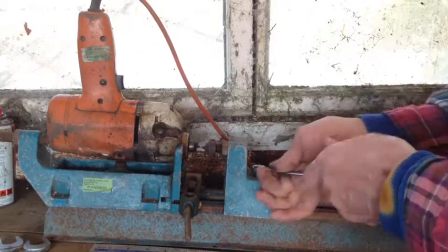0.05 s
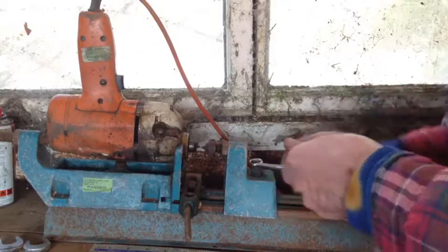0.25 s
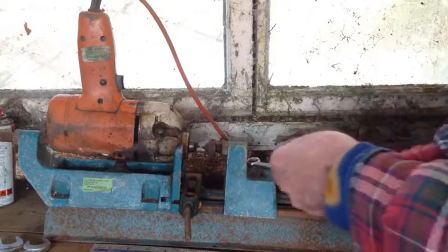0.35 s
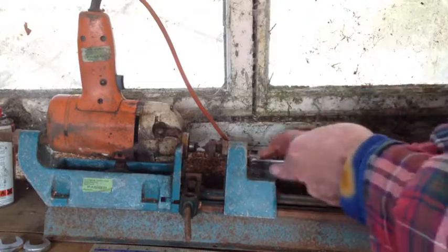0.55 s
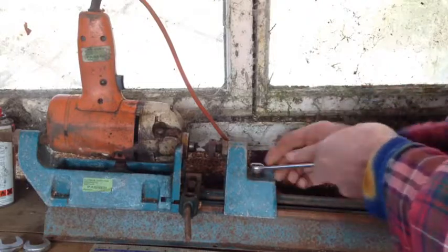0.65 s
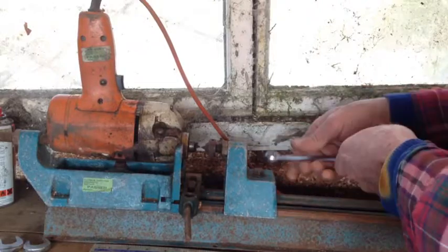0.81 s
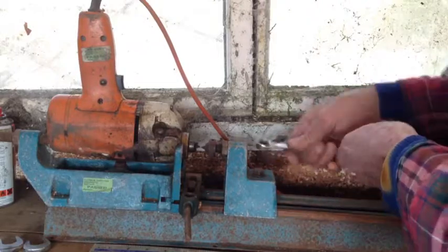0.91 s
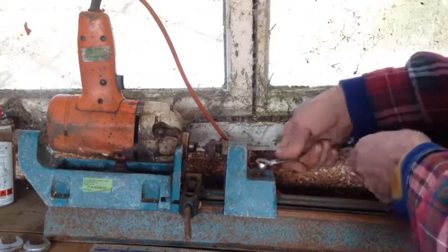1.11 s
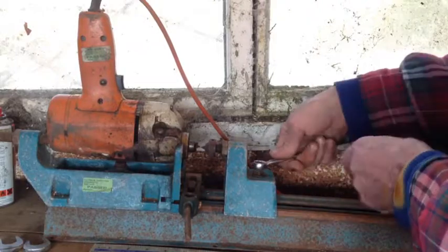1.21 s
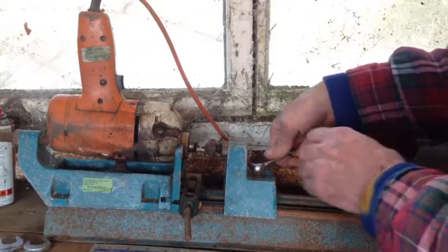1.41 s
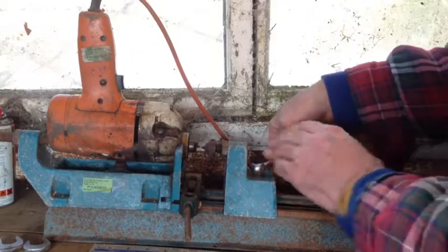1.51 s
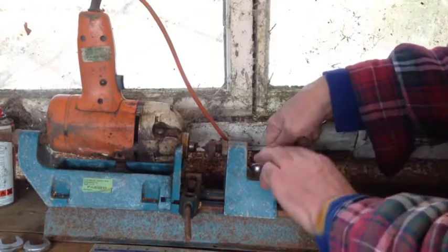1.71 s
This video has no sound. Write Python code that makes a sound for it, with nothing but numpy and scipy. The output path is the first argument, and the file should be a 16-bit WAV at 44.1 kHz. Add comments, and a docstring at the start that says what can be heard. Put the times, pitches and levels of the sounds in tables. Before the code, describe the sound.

A steel spanner clinks and knocks on a nut of a heavy cast-iron machine in a workshop

```python
"""A spanner is fitted on a nut of a cast-iron machine bed and turned, in a small workshop.
First come clustered knocks and rubs, then a pause, one lone knock, and a second cluster ending in a rub.
Each knock sums decaying steel and bed modes, a dense noise tail with a wall step, a clack and a thump.
Rubs are random slips convolved with tail and bed; sleeve rustle and room noise run throughout."""
import sys
import numpy as np
from scipy import signal
from scipy.fft import rfft, irfft
from scipy.io import wavfile
from scipy.ndimage import uniform_filter1d

SR = 44100
rng = np.random.default_rng(int(sys.argv[2]) if len(sys.argv) > 2 else 0)


def digitize_waveform(pressure):
    """Quantize a signal to 16-bit integers and store it at the path in sys.argv[1].

    Rows of a 2-D input are taken as channels; values are limited to [-1, 1].
    """
    field = np.atleast_2d(pressure).T
    bounded = np.clip(field, -1, 1)
    quanta = np.round(bounded * 32767).astype(np.int16)
    wavfile.write(sys.argv[1], SR, quanta)


N = 77175
LENGTH = 16384  # samples per impact response
T = np.arange(LENGTH) / SR


def amp(db):
    """Decibels to gain."""
    return 10 ** (np.asarray(db) / 20)


def unit(x):
    """Scales to rms 1."""
    return x / np.sqrt(np.mean(x ** 2) + 1e-20)


def read(points, hz):
    """Reads a table on a log-frequency axis."""
    f, value = np.transpose(points)
    return np.interp(np.log(hz + 1), np.log(f + 1), value)


def add(mix, s, sound):
    """Mixes a sound in at time s."""
    part = mix[max(round(s * SR), 0):][:len(sound)]
    part += sound[:len(part)]


def noise(points, size):
    """Steady noise shaped by a (Hz, dB) spectrum."""
    spectrum = rfft(rng.standard_normal(size))
    hz = np.fft.rfftfreq(size, 1 / SR)
    return irfft(spectrum * amp(read(points, hz)), size)


def lowpass(x, hz, order=2):
    """Causal Butterworth low-pass."""
    sos = signal.butter(order, min(hz, .47 * SR), fs=SR, output="sos")
    return signal.sosfilt(sos, x)


def rise(seconds, delay=0):
    """Smooth attack from 0 to 1."""
    return 1 - np.exp(-(np.maximum(T - delay, 0) / seconds) ** 2)


def ring(modes):
    """Sums decaying partials (Hz, dB, t60 s); neighbours in the list start in opposite directions."""
    total = np.zeros(LENGTH)
    for k, (hz, db, t60) in enumerate(modes):
        total += (-1) ** k * amp(db - 60 * T / t60) * np.sin(2 * np.pi * hz * T)
    return total


def knock(db, cut_hz, ring_db, low_db, bed_db, thump_db, clack_hz, clack_db):
    """A blow excites spanner, bed and tail, duller when the contact is soft; clack and thump bypass that cut."""
    metal = wash() + spanner(ring_db, low_db) + amp(bed_db) * bed()
    contact = lowpass(metal, cut_hz, order=3)
    return amp(db) * (contact + amp(clack_db) * clack(clack_hz) + amp(thump_db) * thump())


def spanner(ring_db, low_db):
    """Steel modes of spanner and nut ring; the lowest ones have their own extra level."""
    # spanner and nut modes: mode_hz, relative_level_db
    steel_modes = [(1667, -29), (1716, -25), (1759, -20), (1829, -29), (2363, -32), (2462, -28),
                   (2780, -33), (3082, -24), (3712, -23), (3778, -25), (4056, -27), (4274, -24),
                   (5060, -26), (5367, -23), (5523, -24), (5728, -27), (6093, -27), (6410, -29),
                   (7183, -27), (7546, -27), (8067, -29), (8733, -27), (8880, -30), (10353, -30),
                   (12847, -36), (14115, -31)]
    # their decay: frequency_hz, t60_s
    steel_t60 = [(1700, 0.22), (3500, 0.15), (6000, 0.13), (9000, 0.12), (14000, 0.11)]
    low_modes_hz, rise_s = 2100, 0.0025
    modes = []
    for hz, level_db in steel_modes:
        level_db += ring_db + low_db * (hz < low_modes_hz)
        modes.append((hz, level_db, read(steel_t60, hz)))
    return ring(modes) * rise(rise_s)


def bed():
    """The heavy casting answers a blow with a low clunk."""
    # machine bed modes: mode_hz, relative_level_db, t60_s
    bed_modes = [(336.5, -28.5, 0.12), (377.3, -29, 0.16), (576.7, -33.5, 0.15), (798.8, -15.5, 0.099),
                 (849, -21.5, 0.078), (938.4, -20.5, 0.14), (1110.6, -20.5, 0.11), (1155, -27.5, 0.19),
                 (1976, -36.5, 0.14)]
    delay_s, rise_s = 0.00054, 0.0056
    return ring(bed_modes) * rise(rise_s, delay_s)


def wash():
    """Countless weak modes and reflections: a direct crack, a slower bass and a step up from the near wall."""
    # dense ringing of machine and room: frequency_hz, relative_level_db
    wash_spectrum = [(25, -56.5), (70, -38), (190, -27.5), (330, -13), (450, -15), (600, -9.5), (710, -16),
                     (850, -7.5), (1150, -11.5), (1420, -14.5), (1800, -9), (2200, -11.5), (3000, -9.5),
                     (5600, -9.5), (9000, -10.5), (12000, -17.5), (14400, -12), (15600, -53.5)]
    # its decay: frequency_hz, t60_s
    wash_t60 = [(200, .2), (530, 0.19), (1400, 0.16), (3700, 0.14), (9700, 0.088), (15000, .09)]
    rise_s, bass_rise_s, bass_hz = 0.00025, 0.002, 1190
    direct_db, direct_s = -1.5, 0.0022
    wall_s, wall_db = 0.0025, -3.5

    hz, t, z = signal.stft(noise(wash_spectrum, LENGTH), SR, nperseg=256)
    decay = amp(-60 * t / read(wash_t60, hz)[:, None])
    tail = signal.istft(z * decay, SR, nperseg=256)[1][:LENGTH]
    # forward and backward passes cancel the phase shift
    bass = lowpass(lowpass(tail, bass_hz)[::-1], bass_hz)[::-1]
    crack = amp(direct_db) * np.diff(tail, prepend=0) * np.exp(-T / direct_s)
    wall = np.sqrt(1 + amp(wall_db) ** 2 * rise(rise_s, wall_s))
    return wall * (bass * rise(bass_rise_s) + (tail - bass + crack) * rise(rise_s))


def clack(pitch_hz):
    """The jaw clacks: three short partials and a tail resonating at their pitch."""
    t60_s, rise_s, spread = 0.028, 0.00013, .07
    echo_db, echo_q = 7.5, 4
    cluster = [(pitch_hz * (1 + spread * k), -9 * abs(k) - 4, t60_s) for k in (-1, 0, 1)]
    echo = signal.lfilter(*signal.iirpeak(pitch_hz, echo_q, SR), wash())
    return ring(cluster) * rise(rise_s) + amp(echo_db) * echo


def thump():
    """The bench thumps: one low mode with a slow attack."""
    pitch_hz, gain_db, t60_s, rise_s = 339, 4.5, 0.037, 0.0089
    return ring([(pitch_hz, gain_db, t60_s)]) * rise(rise_s)


def rub(length_s, db, cut_hz, bed_db):
    """Tiny random slips under one stroke excite the bed and the tail."""
    slips_per_s = 1100
    slips = rng.standard_normal(LENGTH) * (rng.random(LENGTH) < slips_per_s / SR)
    slips *= np.sqrt(np.abs(np.sin(np.pi * np.minimum(T / length_s, 1))))
    slips /= np.linalg.norm(slips) + 1e-9
    response = wash() + amp(bed_db) * bed()
    return amp(db) * lowpass(signal.fftconvolve(slips, response), cut_hz, order=4)


def sleeves():
    """Moving sleeves rustle: shaped noise whose level drifts and flutters."""
    # rustle colour: frequency_hz, relative_density_db
    sleeve_spectrum = [(100, -4), (400, -9), (1800, -1.5), (5000, -5), (10000, -11.5), (14800, -11.5),
                       (15700, -46.5)]
    # rustle level before flutter: time_s, level_db
    sleeve_level = [(0, -62.5), (.13, -63), (.2, -55), (.47, -60.5), (0.602, -57), (0.848, -59.5),
                    (1.02, -55), (1.09, -65.5), (1.339, -60.5), (1.6, -57.5), (1.75, -55.5)]
    flutter_db, flutter_s = 1, 0.016
    flutter = unit(uniform_filter1d(rng.standard_normal(N), max(int(flutter_s * SR), 1)))
    level_db = np.interp(np.arange(N) / SR, *np.transpose(sleeve_level)) + flutter_db * flutter
    return amp(level_db) * unit(noise(sleeve_spectrum, N))


def room():
    """The quiet room: steady, mostly low noise."""
    # room noise colour: frequency_hz, relative_density_db
    room_spectrum = [(25, -31.5), (45, -20), (80, -4), (170, -0.5), (260, -3.5), (450, -11.5), (800, -11),
                     (1500, -24), (4000, -33), (9000, -36.5), (15000, -34)]
    level_db = -58
    return amp(level_db) * unit(noise(room_spectrum, N))


def scene():
    """Knocks and rubs over rustle and room noise."""
    # jaw meets nut: start_s, strength_db, contact_cutoff_hz, spanner_ring_db, extra_low_modes_db,
    # bed_clunk_db, thump_db, clack_pitch_hz, clack_db (all but strength relative to the knock)
    knocks = [(0.139, -24, 3240, -4, 0, 12.5, -18, 2593, -10),
              (0.168, -38.5, 5800, -16, 4, 22.5, -27, 2740, -3),
              (0.181, -20, 1900, -17, 0, -1, -9, 1300, -15),
              (0.2466, -0.5, 12000, 3.5, -4.5, -1, -18, 5610, -7.5),
              (0.2533, -9, 7000, -5.5, -4.5, -28, -20, 1180, -4.5),
              (0.3490, -15, 2980, -9.5, 0, 9, -23, 2860, -11.5),
              (0.41, -29, 1500, -14, 1, 4.5, -7, 980, -5),
              (0.5160, -19, 3520, 1, -8.5, 11, -17, 2720, -7.5),
              (0.5915, -22.5, 1400, -4, 2.5, 12.5, -14, 1190, -10.5),
              (0.6893, -3, 14000, 3.5, -0.5, 3, -22.5, 5297, 1),
              (1.1867, -5, 7660, -1, 7, 1.5, -11.5, 2976, 0.5),
              (1.4261, -16, 2450, -13.5, -22, -0.5, 1.5, 1131, 6),
              (1.4351, -19.5, 9260, -21, -7, 1, 5.5, 6270, -2),
              (1.4406, -1.5, 3370, -8, 5, 2, -23.5, 1934, -5),
              (1.4485, -5, 2940, -0.5, -2.5, -8.5, -1, 811, -1.5),
              (1.552, -23.5, 3520, -8, 2, 8.5, -12, 2460, -11.5)]
    # jaw rubs on nut: start_s, length_s, level_db, contact_cutoff_hz, bed_clunk_db (relative)
    rubs = [(0.160, 0.018, -34.5, 9700, -14), (0.280, 0.056, -6, 661, 1.5),
            (0.508, 0.028, -17.5, 4000, 8.5), (0.585, 0.088, -18, 870, 10), (1.372, 0.037, -25.5, 7960, 7),
            (1.384, 0.022, -24, 6500, 10), (1.612, 0.093, -36, 2500, 2.5)]
    mix = room() + sleeves()
    for start_s, *settings in knocks:
        add(mix, start_s, knock(*settings))
    for start_s, *settings in rubs:
        add(mix, start_s, rub(*settings))
    return mix[None]


def record(dry):
    """The microphone loses the top treble; full-scale clipping and the band limit follow."""
    top_hz, edge_hz = 15400, 16500
    heard = np.clip(lowpass(dry, top_hz, order=12), -1, 1)
    band_limit = signal.firwin(255, edge_hz, window=("kaiser", 9), fs=SR)
    return signal.oaconvolve(heard, band_limit[None], "same")


dry = scene()
out = record(dry)
digitize_waveform(out)
```